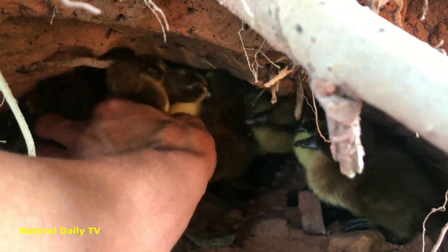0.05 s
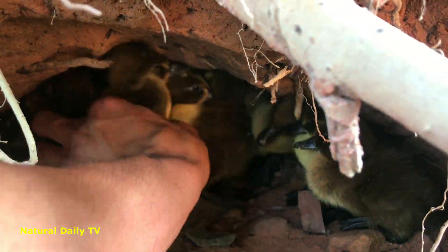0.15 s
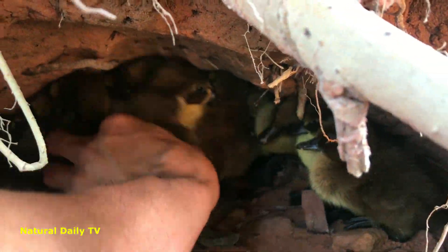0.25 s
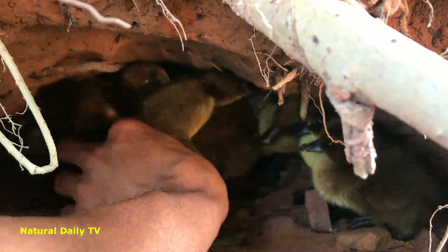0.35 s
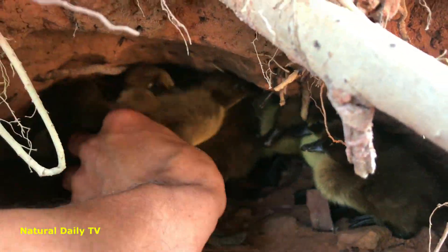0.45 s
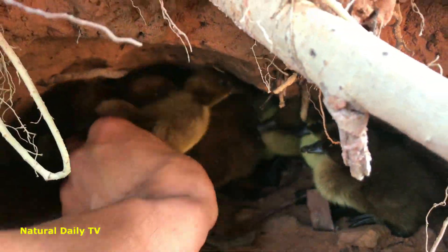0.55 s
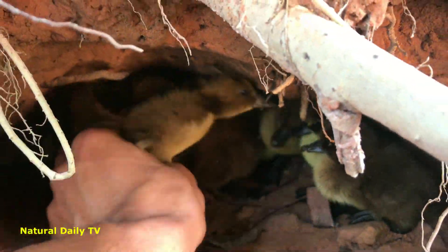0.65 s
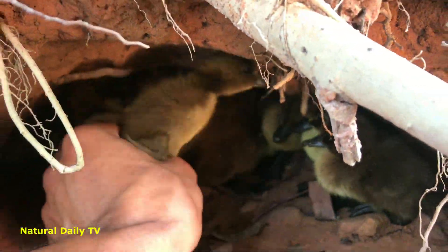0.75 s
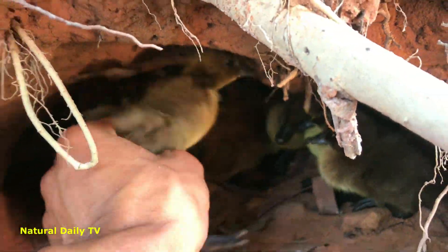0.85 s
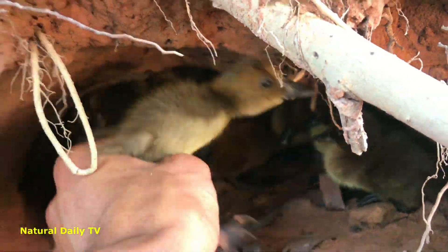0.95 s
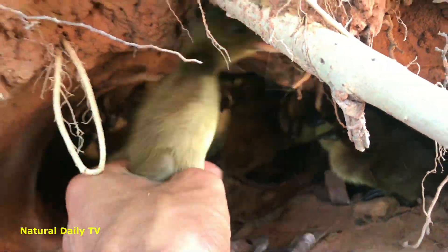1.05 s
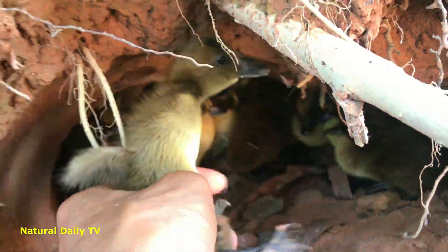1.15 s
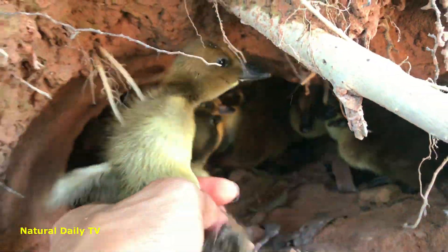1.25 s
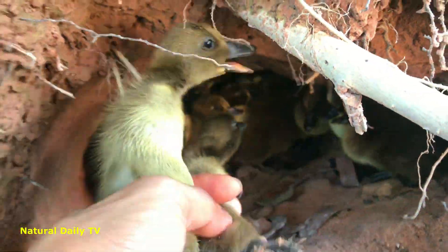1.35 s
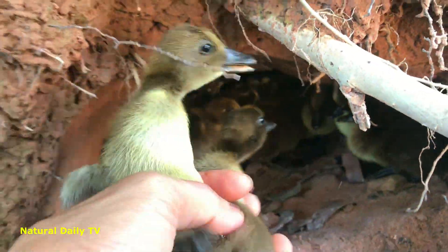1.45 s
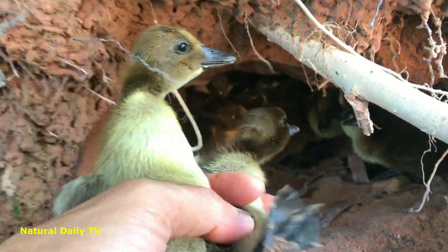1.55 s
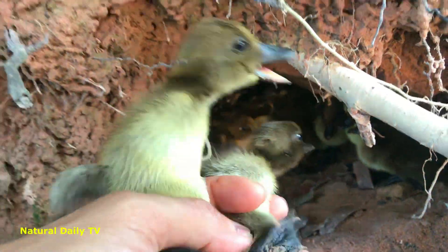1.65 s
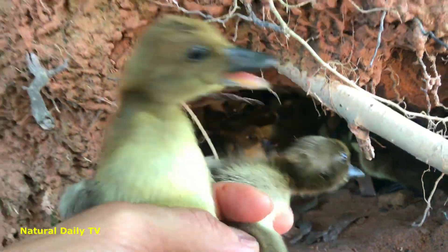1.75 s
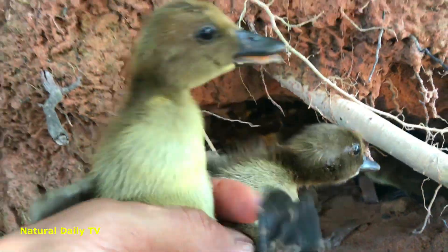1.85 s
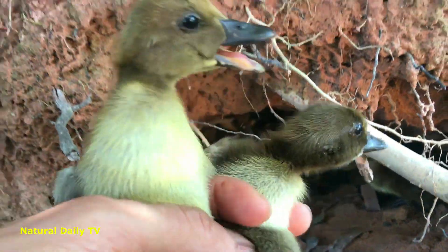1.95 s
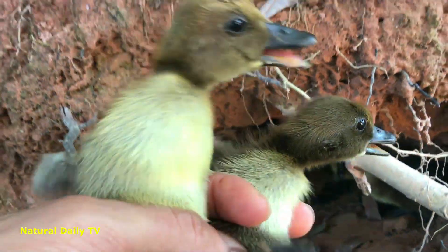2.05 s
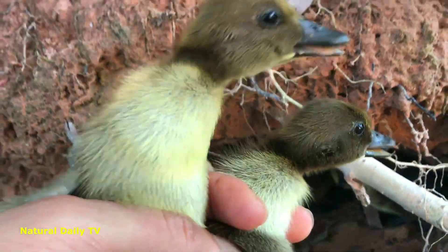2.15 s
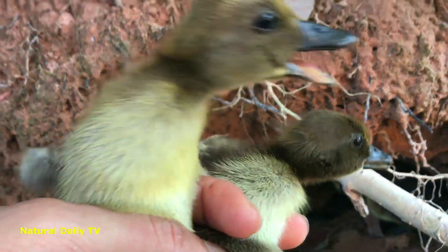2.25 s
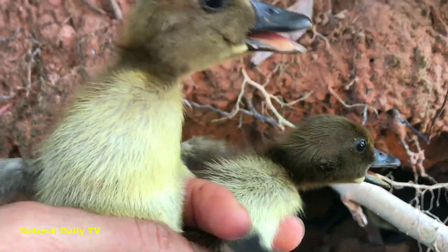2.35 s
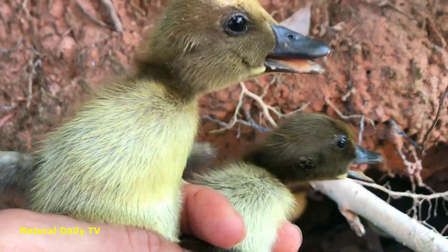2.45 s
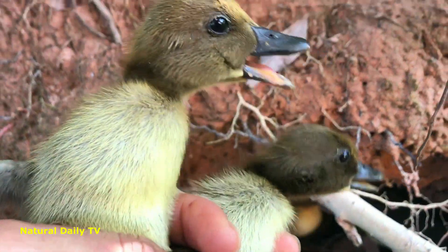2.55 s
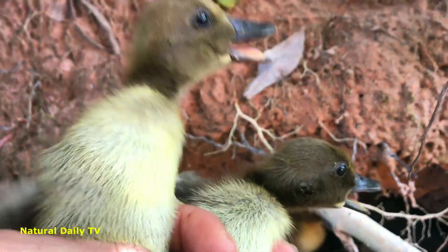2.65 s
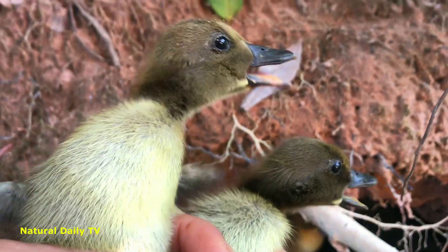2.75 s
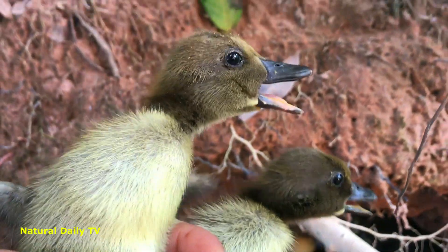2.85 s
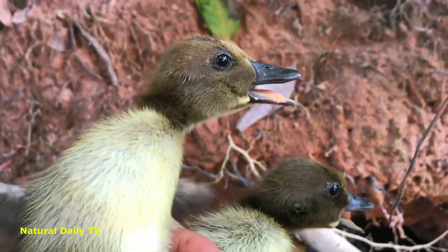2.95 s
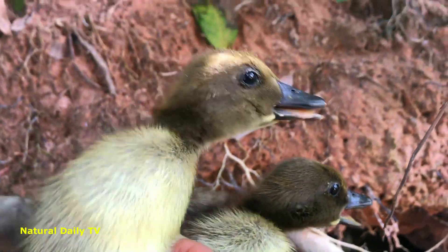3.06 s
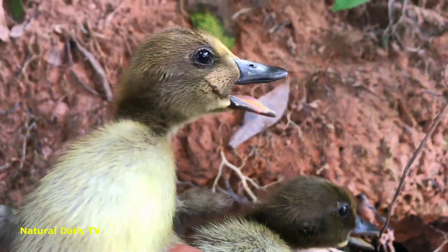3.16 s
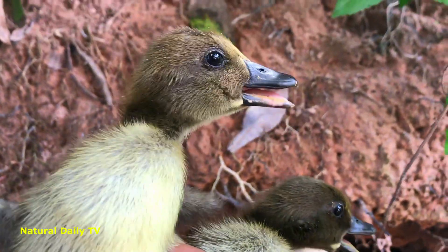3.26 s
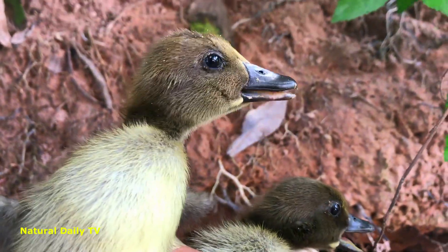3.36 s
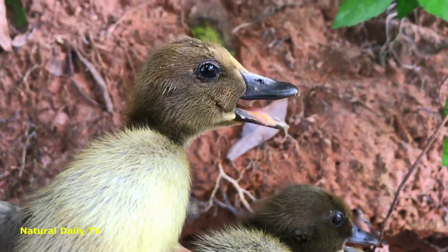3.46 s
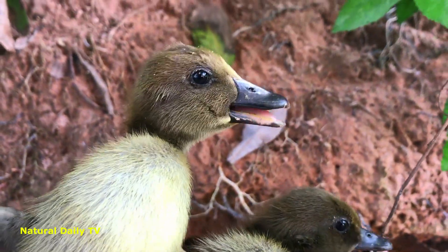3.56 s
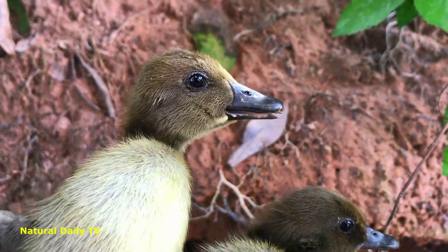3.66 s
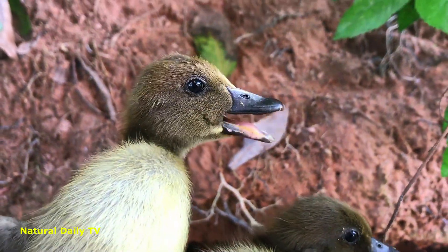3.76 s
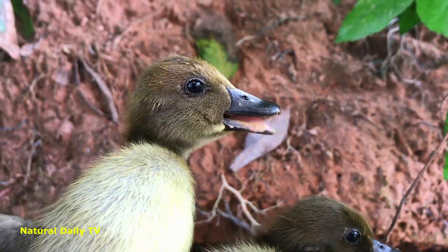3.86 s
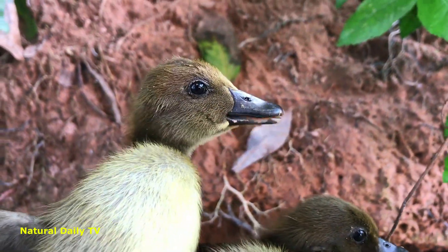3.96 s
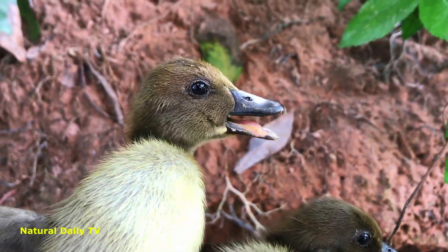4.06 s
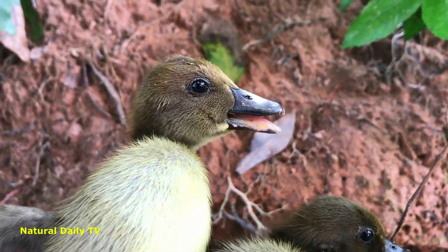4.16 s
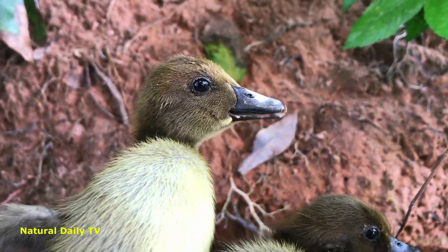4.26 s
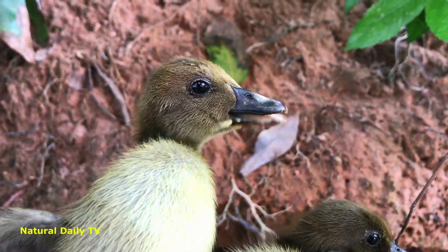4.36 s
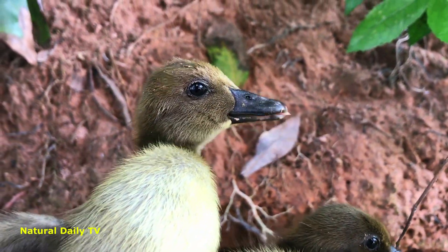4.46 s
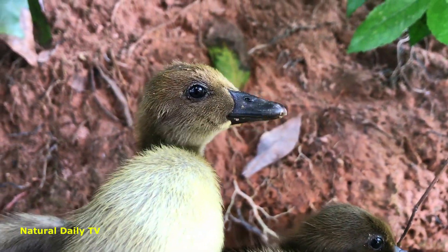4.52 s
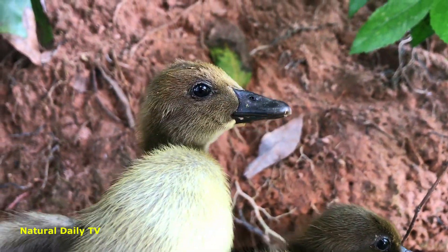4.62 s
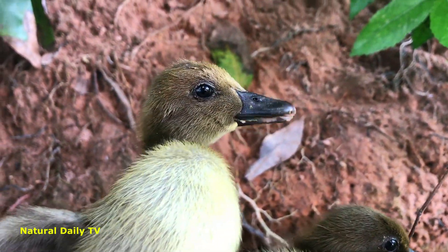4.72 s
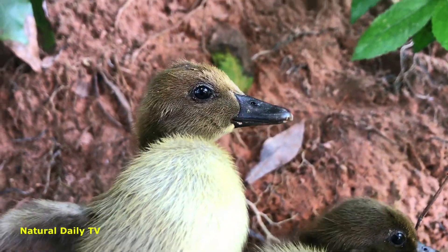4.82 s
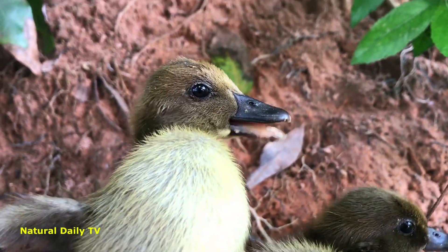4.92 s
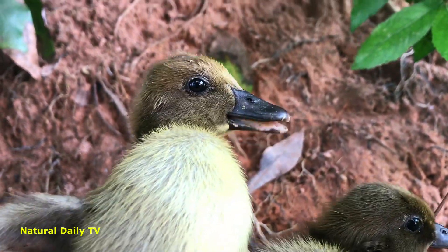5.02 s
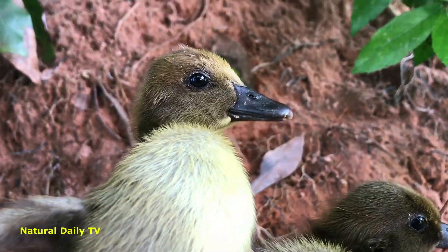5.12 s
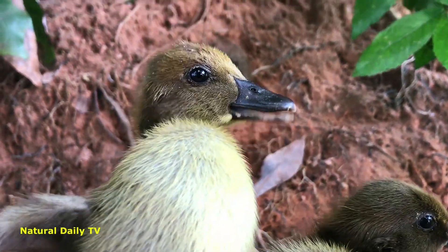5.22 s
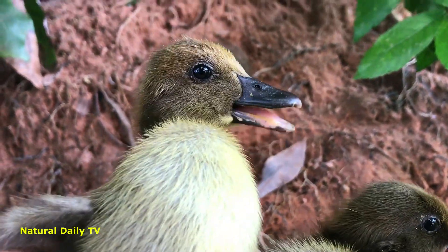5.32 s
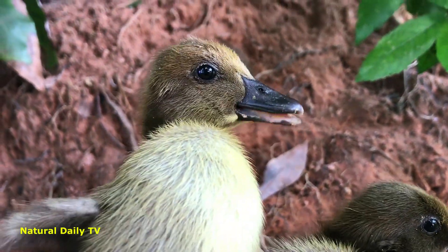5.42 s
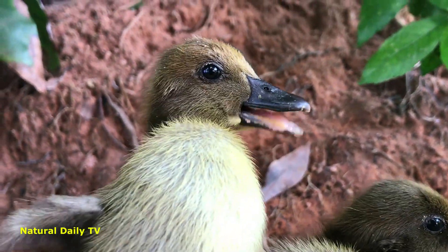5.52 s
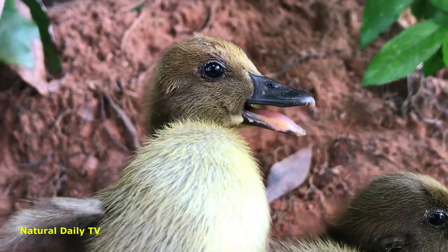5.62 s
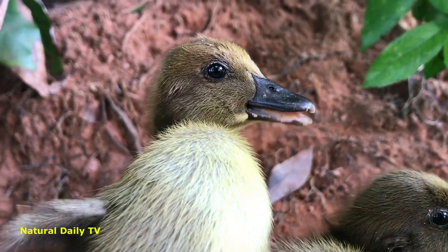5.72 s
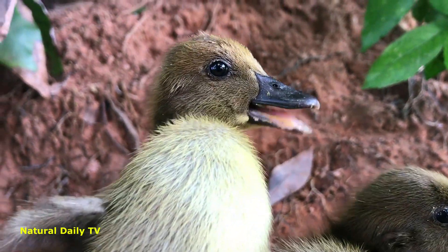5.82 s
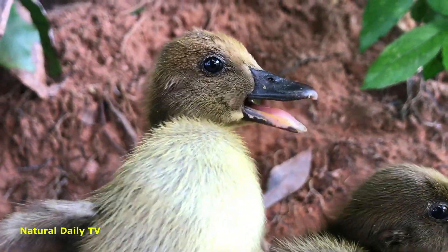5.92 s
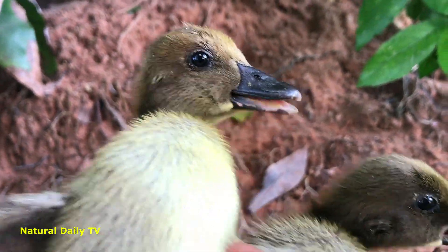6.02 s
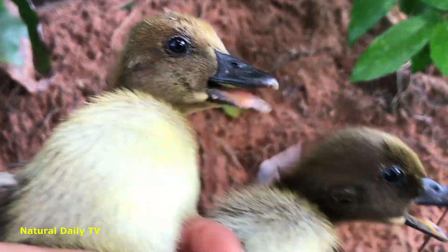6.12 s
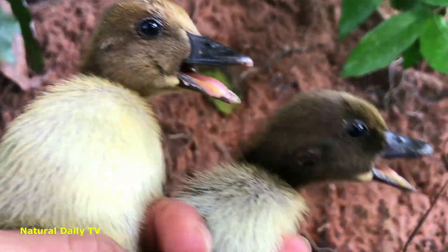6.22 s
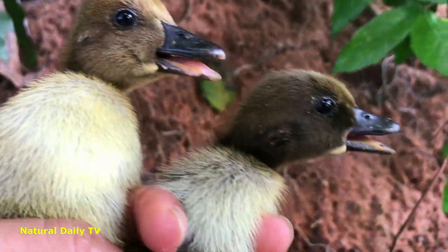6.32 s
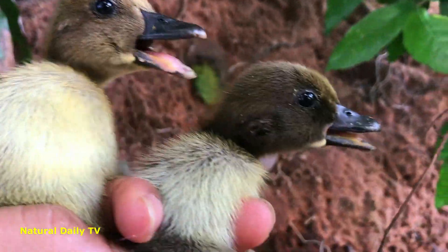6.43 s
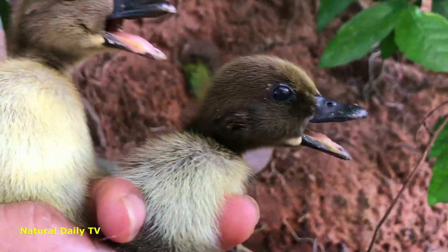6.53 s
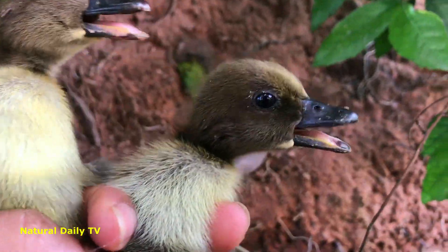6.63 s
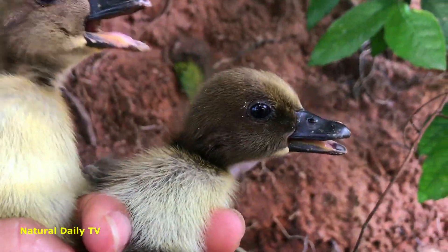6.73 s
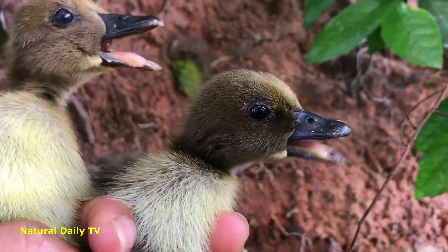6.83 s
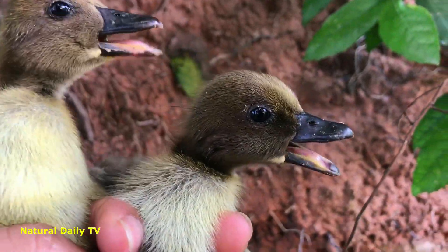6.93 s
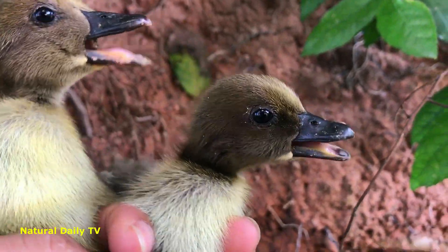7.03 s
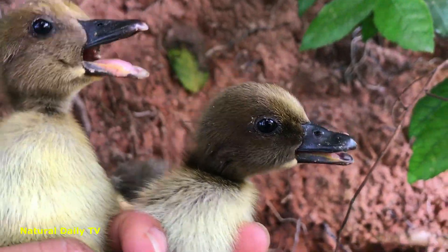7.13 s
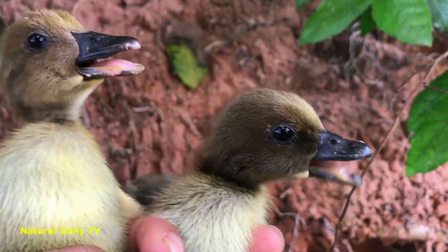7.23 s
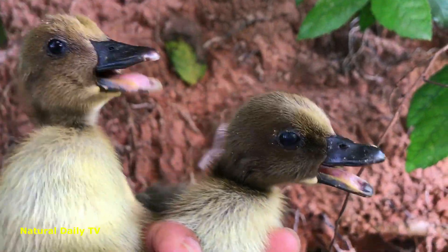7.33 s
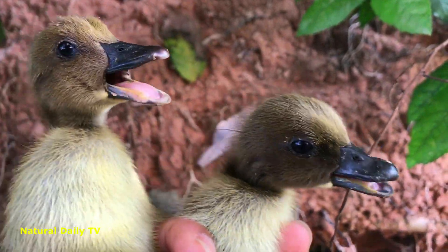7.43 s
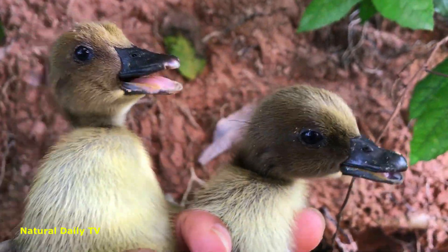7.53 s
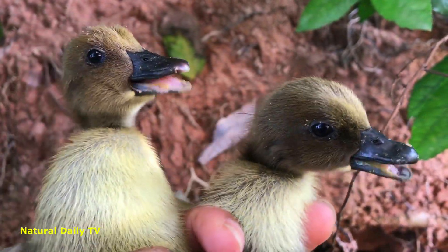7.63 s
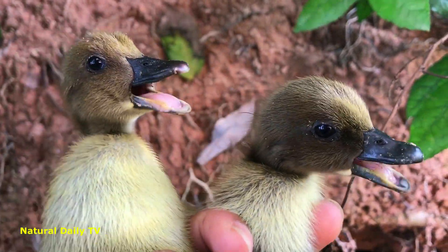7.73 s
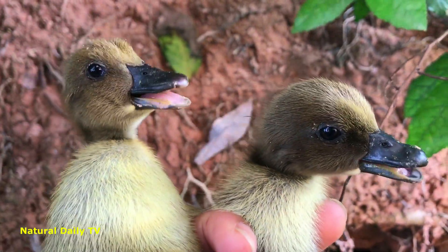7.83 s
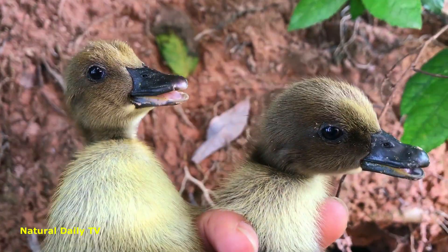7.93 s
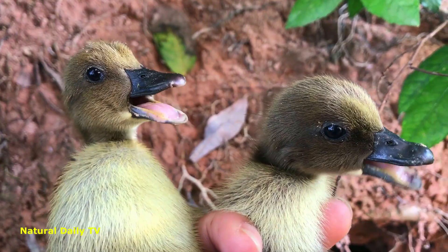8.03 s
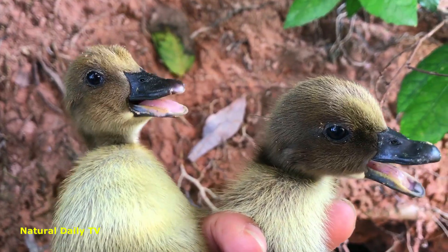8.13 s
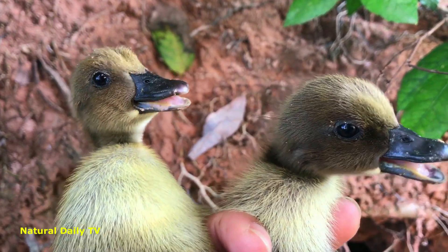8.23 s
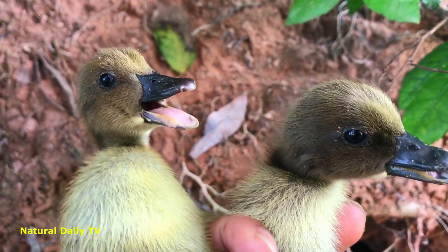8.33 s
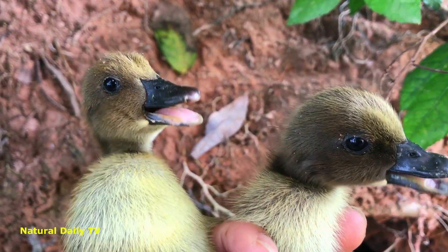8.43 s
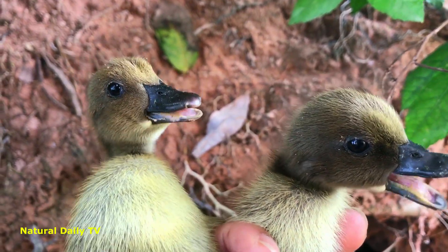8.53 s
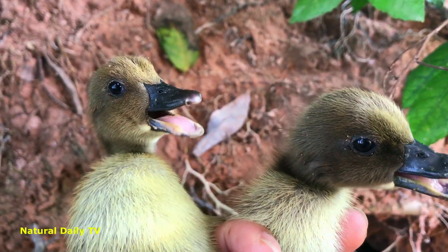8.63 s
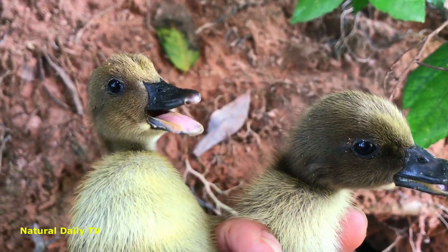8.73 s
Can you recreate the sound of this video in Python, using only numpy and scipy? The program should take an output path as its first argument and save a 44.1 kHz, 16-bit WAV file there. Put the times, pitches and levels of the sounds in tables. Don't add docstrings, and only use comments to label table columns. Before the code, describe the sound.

Close, piercing duckling peeps repeat about three times a second, two voices alternating, over quiet country air, soft rustles and a receding far engine.

```python
import sys
import numpy as np
from scipy import signal
from scipy.io import wavfile
from scipy.ndimage import uniform_filter1d

SR = 44100
rng = np.random.default_rng(int(sys.argv[2]) if len(sys.argv) > 2 else 0)


def undo_db(level):
    steps = np.asarray(level, float) / 20
    return 10 ** steps


def inscribe(sig):
    pcm = np.round(np.clip(np.atleast_2d(sig).T, -1, 1) * 32767)
    wavfile.write(sys.argv[1], SR, pcm.astype(np.int16))


N = 387198
TIME = np.arange(N) / SR


def unit(x):
    return x / np.sqrt(np.mean(x ** 2))


def band(x, hz, width_hz):
    return signal.lfilter(*signal.iirpeak(hz, hz / width_hz, SR), x)


def walk(rate_hz):
    hold = int(SR / rate_hz)
    steps = np.repeat(rng.standard_normal(N // hold + 1), hold)
    return unit(uniform_filter1d(steps, hold)[:N])


def fade(t, start_s, end_s, edge_s):
    return np.clip(np.minimum(t - start_s, end_s - t) / edge_s, 0, 1) ** 2


def partials(phase, hz, table):
    return sum(undo_db(db) * np.sin(k * phase) * (k * hz < SR / 2.3) for k, db in table)


# (frequency [Hz], density [dB per Hz])
AIR_SPECTRUM = [(25, -21), (60, 0), (120, -3), (220, -14.5), (1800, -22.5), (3800, -23.5), (5500, -29.5),
                (16000, -36)]
# (time [s], level [dB])
AIR_LOUDNESS = [(0, -57), (3.0, -58.5), (8.8, -61)]


def air():
    knot_hz, knot_db = np.transpose(AIR_SPECTRUM)
    out = np.zeros(N)
    for hz in 30 * 2 ** np.arange(0, 9.2, .5):
        noise = band(band(rng.standard_normal(N), hz, hz / 2), hz, hz / 2)
        db = np.interp(np.log(hz), np.log(knot_hz), knot_db)
        out += undo_db(db + 0.5 * walk(4.4)) * noise
    return unit(out) * undo_db(np.interp(TIME, *np.transpose(AIR_LOUDNESS)))


# (time [s], firing pitch [Hz], level [dB])
ENGINE_RUN = [
    (0, 132, -64.5),
    (1.0, 124.4, -59.5),
    (2.2, 119.2, -60.5),
    (3.202, 104.1, -64),
    (4.501, 89.4, -70.5),
]


def engine():
    s, hz, db = np.transpose(ENGINE_RUN)
    firing_hz = np.interp(TIME, s, hz) * (1 + 0.0394 * walk(7.4))
    phase = 2 * np.pi * np.cumsum(firing_hz) / SR
    level = undo_db(np.interp(TIME, s, db) + 2 * walk(5.1))
    return np.sqrt(2) * level * (np.sin(phase) + 0.69 * np.sin(phase / 2))


# (start [s], end [s], first
# pitch [Hz], last pitch [Hz], level [dB])
NEST_CHEEPS = [(0, 0.031, 3330, 2870, -43), (.022, 0.084, 2860, 1850, -51), (.183, 0.208, 3800, 4050, -56),
               (1.863, 1.9, 2250, 2750, -62), (8.011, 8.08, 4540, 4100, -61.5),
               (0.02, 0.08, 4250, 3730, -62.5), (0.176, 0.193, 2210, 3360, -50.5),
               (0.188, 0.258, 3400, 2420, -43.5), (0.293, 0.328, 3280, 3000, -54),
               (0.466, 0.487, 4100, 3200, -45.5), (0.617, 0.666, 3250, 2520, -55),
               (0.73, 0.766, 4730, 4500, -67), (0.871, 0.898, 3570, 3420, -55),
               (0.897, 0.923, 3800, 3330, -53), (0.924, 0.974, 3300, 2590, -57),
               (.933, 1.011, 3200, 2930, -54.5), (1.078, 1.13, 4500, 4100, -65),
               (1.155, 1.238, 3320, 2280, -53.5), (1.278, 1.363, 3320, 2350, -56.5),
               (1.675, 1.748, 3500, 2600, -53.5), (1.9, 1.959, 2750, 1970, -59),
               (1.991, 2.088, 3880, 2390, -55.5), (2.343, 2.383, 3500, 2930, -49),
               (5.757, 5.814, 3020, 2210, -63.5), (5.907, 5.95, 2650, 1980, -64),
               (6.091, 6.134, 3020, 2330, -69), (6.726, 6.771, 3050, 2210, -62),
               (7.582, 7.61, 3000, 2150, -64), (7.893, 7.952, 3080, 2330, -60)]
# (end [s], level [dB])
LEAD_SQUEAKS = [
    (3.056, -55),
    (3.348, -56),
    (4.584, -45),
    (4.898, -43.5),
    (5.224, -45.5),
    (5.546, -49),
    (5.871, -48),
    (6.206, -48),
]


def nest():
    squeak_s, from_hz, to_hz = 0.012, 2850, 4230
    bow = .18
    squeaks = [(end - squeak_s, end, from_hz, to_hz, db) for end, db in LEAD_SQUEAKS]
    out = np.zeros(N)
    for start, end, first_hz, last_hz, db in NEST_CHEEPS + squeaks:
        mid_hz = (first_hz + last_hz) / 2 + bow * abs(first_hz - last_hz)
        at = slice(int(start * SR), int(end * SR))
        u = (TIME[at] - start) / (end - start)
        hz = first_hz * (1 - u) * (1 - 2 * u) + mid_hz * 4 * u * (1 - u) + last_hz * u * (2 * u - 1)
        phase = 2 * np.pi * np.cumsum(hz) / SR
        level = undo_db(db + 1.5 - 16.4 * (u - .4) ** 2) * fade(TIME[at], start, end, 0.0022)
        out[at] += level * (np.sin(phase) + undo_db(min(db + 30.5, -16)) * np.sin(2 * phase))
    return np.sqrt(2) * out


# (time [s], level [dB])
CRUMBS = [(.317, -56), (.651, -54), (.908, -50), (0.985, -46), (1.016, -47), (1.113, -43), (1.264, -46),
          (1.357, -49), (1.405, -50), (1.429, -41.5), (4.123, -48), (7.755, -34.5), (8.077, -32),
          (8.39, -40.5)]


def rustles():
    bursts = sum(undo_db(db) * np.exp(-np.abs(TIME - s) / 0.00097) for s, db in CRUMBS)
    return bursts * band(rng.standard_normal(N), 4700, 13300)


def contour(call, tune, effort, mood, croak_db, leap, catches):
    start, crack, end, db = call
    first_hz, last_hz, arch_hz, scoop_hz = tune
    swell_db, dome_db, attack_db, attack_s, rasp_db = effort
    scoop_s, croak_s, drop_s, climb_s = .01, .007, 0.013, 0.011
    crack_s, catch_s = .008, .005
    collapse_db_s, rasp_fade_db_s, hoarsen_db = -600, -120, 13.5
    mood_s, *voices_db = np.transpose(mood)
    hoarse_db, linger_db = (np.interp(start, mood_s, voice_db) for voice_db in voices_db)

    s = np.arange(start, end - drop_s, .001)
    u = np.clip((s - start) / (crack - start), 0, 1)
    late = np.maximum(s - crack, 0)
    hump = 4 * u * (1 - u)
    catch_db, kick_hz = np.zeros((2, 1)) + sum(
        np.outer([depth_db, kick], np.exp(-((s - at) / catch_s) ** 2)) for at, depth_db, kick in catches)

    hz = first_hz + (last_hz - first_hz) * u + arch_hz * hump
    hz = hz * (1 + leap * (1 - np.exp(-late / climb_s)))
    hz = hz - scoop_hz * np.exp(-(s - start) / scoop_s)

    tone = db + swell_db * (u - .5) + dome_db * (hump - .5)
    tone = tone + attack_db * np.clip(1 - (s - start) / attack_s, 0, 1) ** 2
    usual_db = np.median(tone[late == 0])

    hoarse = undo_db(usual_db + hoarse_db + hoarsen_db * (u - .5))
    hoarse = hoarse + undo_db(usual_db + croak_db) * np.exp(-(s - start) / croak_s)
    switch = np.clip((s - crack) / crack_s + .5, 0, 1)
    full_rasp = rasp_db + rasp_fade_db_s * (late - late[-1] / 2)
    rasp = (1 - switch) * 20 * np.log10(hoarse) + switch * full_rasp

    floor_db = np.where(late > 0, rasp + min(linger_db, 2.5), tone)
    tone = np.maximum(tone + collapse_db_s * late, floor_db)
    return np.transpose([s, hz + kick_hz, tone + catch_db, rasp]), end


# (multiple of pitch, level [dB])
HALF_LINES = [(.5, -16), (1.5, 4), (2.5, -6), (3.5, -10.5)]


def peep(rows, end, colour, half_s, half_db, split, chance):
    octave_db, twelfth_db = colour
    s, pitch, tone_db, rasp_db = np.transpose(rows)
    at = slice(max(int((s[0] - .01) * SR), 0), min(int(end * SR), N))
    t = TIME[at]
    wobble, shake, patch, luck, jerk, *drift = chance[:, at]

    falling = np.clip((t - s[-1]) / max(end - s[-1], 1e-3), 0, 1)
    hz = np.interp(t, s, pitch) * (1 - .5 * falling ** 1.3)
    drop_db = max(tone_db.max() - 18, rasp_db[-1] - 2)
    db = np.interp(t, [*s, s[-1] / 2 + end / 2, end], [*tone_db, drop_db, drop_db - 10])
    rasp_knots_db = [rasp_db[0] - 13.5, *np.minimum(rasp_db, -22), rasp_db[-1] - 16.5]
    rasp = np.interp(t, [s[0] - .01, *s, end], rasp_knots_db)
    rough = np.clip(undo_db(rasp - db) * (1 - falling), 0, 1)
    phase = 2 * np.pi * np.cumsum(hz * (1 + (.002 + .025 * rough) * wobble)) / SR

    half = undo_db(twelfth_db - 9.5 + min(half_db + 23, 14) + 2 * patch)
    half = half * fade(t, half_s, end + 1, 0.0017) * partials(phase, hz, HALF_LINES) * (1 - falling)
    overtones = [(2, octave_db), (3, twelfth_db), (4, twelfth_db - 14)]
    overtone = undo_db(2.1 * drift[0]) * partials(phase, hz, overtones)
    wave = np.sin(phase) + (1 - rough) ** 2 * (overtone + half)

    level = fade(t, s[0] - .003, end, 0.0019) * undo_db(db + 0.74 * wobble + 13 * rough ** 2 * shake)
    whistle = np.sqrt(2) * (1 - rough ** 2) * level * wave

    lines = sum(d * np.sin(k * phase / split) for k, d in enumerate(drift, 1) if k % split)
    cycle = (phase / (2 * np.pi)).astype(int)
    puffs = np.diff(cycle, prepend=cycle[0]) * luck * np.sqrt(SR / hz)
    bands = jerk * sum(np.cos(k * phase / 2) for k in range(1, 7))
    order = np.clip(.55 - rough, .1, 1)
    source = 0.55 * order * lines + (1 - order) * (0.21 * bands + 0.89 * puffs)
    return at, whistle, fade(t, t[0], end, 0.00067) * undo_db(rasp + 2 * patch) * source


# (start [s], crack into rasp [s], end of drop [s], whistle level [dB])
LOW_CALLS = [(0.333, 0.389, 0.455, -43), (0.772, 0.805, 0.869, -31), (1.124, 1.161, 1.214, -41),
             (1.447, 1.501, 1.559, -26.5), (1.751, 1.836, 1.863, -16), (2.034, 2.102, 2.162, -21.5),
             (2.322, 2.411, 2.439, -10), (2.617, 2.711, 2.742, -22.5), (2.905, 2.986, 3.02, -23),
             (3.194, 3.267, 3.298, -24.5), (3.526, 3.619, 3.642, -19), (3.829, 3.93, 3.961, -26),
             (4.137, 4.237, 4.257, -26.5), (4.461, 4.528, 4.553, -28.5), (5.022, 5.069, 5.122, -24),
             (5.34, 5.447, 5.469, -26.5), (5.631, 5.746, 5.754, -26.5), (5.923, 6.03, 6.053, -27),
             (6.231, 6.331, 6.356, -21.5), (6.524, 6.643, 6.658, -17.5), (6.831, 6.941, 6.964, -19),
             (7.138, 7.239, 7.278, -21), (7.46, 7.545, 7.58, -18.6), (7.76, 7.861, 7.897, -20.1),
             (8.087, 8.18, 8.217, -18.5), (8.403, 8.495, 8.53, -20), (8.718, 8.782, 8.81, -22.5)]
HIGH_CALLS = [(2.163, 2.209, 2.232, -22.5), (2.452, 2.557, 2.583, -28.5), (2.772, 2.869, 2.902, -26.5),
              (3.062, 3.161, 3.194, -28.2), (3.359, 3.459, 3.489, -24), (3.651, 3.779, 3.792, -28),
              (3.962, 4.063, 4.097, -25.5), (4.263, 4.361, 4.41, -25.7), (4.588, 4.687, 4.735, -26.5),
              (4.905, 5.005, 5.058, -27.5), (5.232, 5.364, 5.38, -31.5), (5.558, 5.675, 5.712, -24),
              (5.881, 5.998, 6.038, -20), (6.215, 6.324, 6.369, -17), (6.579, 6.677, 6.722, -18),
              (6.96, 7.054, 7.099, -19), (7.35, 7.451, 7.483, -11.5), (7.772, 7.838, 7.858, -13.5),
              (8.156, 8.276, 8.306, -16), (8.578, 8.682, 8.712, -17)]
# (first pitch [Hz], pitch at crack [Hz], arch [Hz], scoop [Hz])
LOW_PITCHES = [(2990, 3690.0, -21.5, 639), (4230, 3790.0, -220.0, 540.0), (3800, 3900, 60, 198.5),
               (3930.0, 4380.0, -59, 89), (4120, 3990.0, 226.5, 482.5), (3734, 4070.0, 121.5, -160.0),
               (3790, 4210.0, 70.0, -170.0), (3830.0, 4160.0, -41.5, 229.5), (3940, 3955, -140.0, 351.5),
               (4100.0, 4090.0, -170.0, 368), (4080.0, 3950.0, -220.0, 727.5),
               (3930, 4010.0, -300.0, 162.5), (3856, 3850, -180.0, 7.5), (3760.0, 3574, -81.5, 158),
               (4180, 3900.0, -300.0, 458.5), (3790, 3560.0, -150.0, 10.0), (3495, 3750, -1, -72.5),
               (3350, 3750.0, 178, -450.0), (3840.0, 4180.0, 8.5, 254.5), (3820, 4300, 119.5, 52),
               (3715, 4260.0, 208.5, 19), (3893, 4030.0, 71, 527), (3850, 4130.0, 127, 198.5),
               (3840, 4240.0, -80.0, 91), (3990, 4080.0, -40.5, 511), (3800.0, 4100.0, 49.5, 110.5),
               (3730, 3910.0, 109.5, -250.0)]
HIGH_PITCHES = [(4650, 4590.0, -80.0, -210.0), (4600, 5020.0, -120.0, -100.0),
                (5000, 4990.0, -490.0, 798.5), (4670, 4810.0, -450.0, 324.5), (4490, 4470.0, -280.0, 358),
                (4360, 4480.0, -320.0, 180.5), (4380, 4440.0, -240.0, 85.5), (4410.0, 4570.0, -140.0, 169),
                (4486, 4650.0, -240.0, 210.5), (4340, 4590.0, -48.5, 106), (4380, 4590.0, -20.0, 162.5),
                (4500.0, 4550.0, -49, 250.0), (4373, 4560.0, -10.5, 109), (4520, 4400.0, 80.0, 229.5),
                (4500.0, 4630.0, -150.0, 368), (4400, 4560.0, 169.5, 97), (4170, 4430.0, 351, -80.5),
                (4390, 4660.0, -48.5, 251.5), (4310, 4440.0, 260.5, 150.0), (4520, 4650.0, -29, 258.5)]
# (swell to crack [dB], dome [dB], attack depth [dB], attack [s], rasp level [dB])
LOW_BREATHS = [(3.5, 1.5, -6, 0.014, -38.5), (9, 2, -5.5, 0.008, -37), (5.5, 0.5, -7.5, 0.014, -39.5),
               (5.5, 4, -8, 0.008, -28.5), (-16, 3, -32.5, 0.032, -30.5),
               (-12.5, -11.0, -29.0, 0.015, -25.5), (-33.5, -12, -41.5, 0.045, -27.5),
               (-9, -9.5, -27, 0.026, -31.5), (-3, 4, -14, 0.022, -34.5), (5, 6, -15.5, 0.0091, -30),
               (-16, -10, -38, 0.027, -32), (-1, 4, -14.5, 0.0046, -37.0), (-1, -1, -9, 0.0074, -30),
               (-8, 5.5, -14.5, 0.011, -44.5), (-16.5, -2.5, -18, 0.015, -31.5),
               (-11, 3.5, -8.2, 0.016, -41.5), (-5.5, 0, -18.5, 0.0085, -30), (4.5, 1, -18.5, 0.01, -35),
               (6, -0.5, -17.5, 0.011, -31), (5, 4, -12, 0.019, -44.5), (0.5, 5.5, -12.5, 0.019, -28),
               (4.5, 2.5, -14.5, 0.032, -33), (-7.5, -3, -19, 0.032, -28.5), (3.5, 4.5, -15, 0.019, -29.5),
               (2.5, -0.2, -10.5, 0.022, -27.5), (6, 4.5, -11, 0.011, -29.0),
               (-2.7, -1.8, -18.5, 0.016, -35.5)]
HIGH_BREATHS = [(-20.4, -18.5, -33, 0.012, -43), (4.5, 1.2, -7.5, 0.014, -31),
                (-8.5, 9, -11.5, 0.0052, -41), (-3.4, 1, -10.5, 0.018, -35), (-15.5, -9, -24, 0.035, -36.5),
                (-6, 1.7, -14, 0.014, -36), (-9, -4.5, -12, 0.038, -34.0), (-11, 7.8, -10.5, 0.011, -33.5),
                (-11.5, 10, -12, 0.016, -33), (-20.5, 3.5, -11.5, 0.023, -34.5), (14, 1, 15.5, 0.072, -31),
                (6.5, 1, -11, 0.027, -31), (-2, 7.5, -11.5, 0.013, -29.5), (-7.5, 3, -19, 0.012, -32),
                (-14.5, 1.5, -11.5, 0.071, -34.5), (-3, 4.5, -15, 0.008, -35),
                (-16.5, -8.5, -26.5, 0.031, -30.5), (-2.7, -0.6, -21.5, 0.018, -27.5),
                (-9, 0.1, -20.5, 0.014, -32.5), (-16.5, 5.5, -15, 0.019, -34.5)]
# (octave level [dB], twelfth level [dB])
LOW_OVERTONES = [(-16, -20), (-27.7, -20.5), (-12.2, -5), (-5.5, -10.5), (-20.5, -20.5), (-14, -10),
                 (-22.5, -23), (-14.5, -14.5), (-20, -18.5), (-17.5, -18.5), (-22.0, -19), (-14.5, -9),
                 (-17.0, -6.5), (-8, -8), (-15, -6.5), (-14, -14.5), (-13.5, -13), (-17.5, -9), (-14, -12),
                 (-17, -14.5), (-20.5, -15), (-20, -13), (-11.5, -13.5), (-14.5, -11), (-18, -11.5),
                 (-17.5, -12), (-18.5, -10.5)]
HIGH_OVERTONES = [(-32, -27.8), (-18, -27), (-32, -35.6), (-19, -31.1), (-11.5, -24), (-16.5, -25),
                  (-16, -22), (-24.5, -31), (-25, -31), (-20.5, -30.7), (-15.5, -26), (-25.5, -29),
                  (-29, -37.5), (-28.5, -37), (-20.5, -44), (-29.5, -32), (-35, -36), (-22, -32),
                  (-26.5, -32), (-24.5, -40.5)]
# (onset [s], half-pitch level [dB])
LOW_DOUBLINGS = [(0.335, -37), (0.77, -15), (1.127, -6), (1.475, -2), (1.775, -17.5), (2.062, -16),
                 (2.345, -21), (2.638, 16), (2.94, -19), (3.23, -15), (3.584, -9), (3.86, -36),
                 (4.196, -22), (4.515, -4), (5.051, -8), (5.375, -16.5), (5.7, -50), (5.99, -19.5),
                 (6.29, -18.5), (6.56, -24.5), (6.899, -24), (7.165, -22.5), (7.485, -20.5), (7.83, -21),
                 (8.09, -21.5), (8.44, -20), (8.74, -29)]
# (time [s], hoarseness under whistle [dB], whistle over rasp [dB])
LOW_VOICE = [(.35, -16.5, -16), (.8, -27, 11), (1.15, -17, -1.5), (1.45, -18.5, -1), (1.76, -21.5, -1),
             (2.05, -21.5, 2), (2.32, -23.5, 0.5), (3.2, -27.5, 0.5), (3.83, -28, 0), (5.02, -13.5, 1.5),
             (5.34, -14, -1), (5.929, -24, 2), (7.14, -26.5, -10), (7.77, -23, -4.5), (8.1, -19, -4)]
HIGH_VOICE = [(2.449, -8.5, 0.5), (2.77, -13, -5), (3.96, -17, 0), (4.26, -31.5, -11), (4.9, -25, -5),
              (5.23, -15, -3), (5.56, -23.5, 0.5), (6.22, -28.5, 1), (6.601, -16, 0), (8.58, -18.5, -2)]
# (time [s], depth [dB], pitch kick [Hz])
VOICE_CATCHES = [
    (2.192, -21, 0.5),
    (5.287, -12.5, 3.2),
    (5.299, -14.5, 0.57),
    (7.035, -4.5, 134),
    (7.396, -8.5, 180),
    (7.426, -15.5, 110),
]
# (centre [Hz], width [Hz], level [dB])
THROAT_RINGS = [(1964, 2700, -18), (3400, 1280, -4.5), (4500, 1160, 0.5), (5820, 870, 3), (7080, 1670, -8),
                (11960, 3300, -9)]
# (time [s], lowest ring level [dB], highest ring level [dB])
BEAK_GAPE = [(.4, 10.5, -1.5), (.83, 4, -1.5), (1.18, 13, 9.5), (1.5, -1.5, 4.5), (2.2, -3, -1),
             (3.2, -0.5, -7), (4.7, -4, -5.5), (5.999, 0.5, -6.5), (7.1, 0, -3), (8, 2, -1)]


def ducklings():
    drift = walk(180)
    luck = np.tanh(rng.standard_normal(N)) * 1.6
    chance = [walk(90), walk(260), walk(120), luck, walk(1400)]
    chance = np.array(chance + [np.roll(drift, k * SR // 7) for k in range(10)])

    calls = []
    for call, tune, effort, colour, half in zip(
            LOW_CALLS, LOW_PITCHES, LOW_BREATHS, LOW_OVERTONES, LOW_DOUBLINGS):
        shape = contour(call, tune, effort, LOW_VOICE, croak_db=-21.5, leap=.06, catches=[])
        calls.append(peep(*shape, colour, *half, 4, chance))
    for call, tune, effort, colour in zip(HIGH_CALLS, HIGH_PITCHES, HIGH_BREATHS, HIGH_OVERTONES):
        shape = contour(call, tune, effort, HIGH_VOICE, croak_db=-13.5, leap=.03, catches=VOICE_CATCHES)
        calls.append(peep(*shape, colour, call[2], -60, 3, chance))

    tone, chaos = np.zeros(N), np.zeros(N)
    for at, whistle, rasp in calls:
        tone[at] += whistle
        chaos[at] += rasp

    rings = [undo_db(db + 3.5 * walk(60)) * band(band(chaos, hz, width), hz, 2 * width)
             for hz, width, db in THROAT_RINGS]
    s, chest_db, bright_db = np.transpose(BEAK_GAPE)
    rings[0] = rings[0] * undo_db(np.interp(TIME, s, chest_db))
    rings[-1] = rings[-1] * undo_db(np.interp(TIME, s, bright_db))
    return tone + undo_db(6.0) * (sum(rings[::2]) - sum(rings[1::2]))


# (centre [s], length [s], level [dB])
FAR_QUACKS = [
    (0.609, 0.12, -52),
    (1.6, 0.14, -52.5),
]


def quacks():
    noise = rng.standard_normal(N)
    swell = sum(undo_db(db) * np.exp(-((TIME - s) / (length / 2)) ** 4) for s, length, db in FAR_QUACKS)
    low = band(band(noise, 290, 36), 286, 74)
    high = band(band(noise, 916, 200), 700, 270)
    return swell * unit(low + 0.7 * high)


# (start [s], end [s], pitch [Hz], level [dB])
FAR_COOS = [
    (1.183, 2.817, 365, -71),
    (4.153, 4.657, 817, -70),
]


def coos():
    notes = sum(undo_db(db) * fade(TIME, start, end, 0.028) * np.sin(2 * np.pi * hz * TIME)
                for start, end, hz, db in FAR_COOS)
    return notes * undo_db(2 * walk(20))


# (time [s], level [dB])
TICKS = [
    (2.308, -61.5),
    (3.816, -60),
    (5.331, -58),
    (5.618, -62),
    (6.666, -54),
]


def ticks():
    bursts = sum(undo_db(db + 28.0) * np.exp(-np.abs(TIME - s) / 0.00081) for s, db in TICKS)
    return bursts * band(rng.standard_normal(N), 1670, 8400)


def echo(birds):
    t = TIME[:SR // 2]
    decay = undo_db(-53.0 - 60 * t / 0.17) + undo_db(-73 - 60 * t / 0.28)
    scatter = rng.standard_normal(len(t)) * decay * (t > .004)
    return band(signal.fftconvolve(birds, scatter)[:N], 4300, 2500)


def scene():
    background = air() + engine()
    birds = nest() + ducklings()
    small = rustles() + quacks() + coos() + ticks()
    return (birds + echo(birds) + small + background)[None]


def band_limit(x):
    return signal.sosfilt(signal.butter(12, 16940, fs=SR, output="sos"), x)


def record(dry):
    loudness = uniform_filter1d(np.abs(dry), SR // 40)
    wet = dry / (1 + 2.0 * loudness)
    top_cut = signal.ellip(8, .2, 60, 15800, fs=SR, output="sos")
    wet = signal.sosfilt(top_cut, wet)
    return band_limit(wet)


dry = scene()
out = record(dry)
inscribe(out)
```